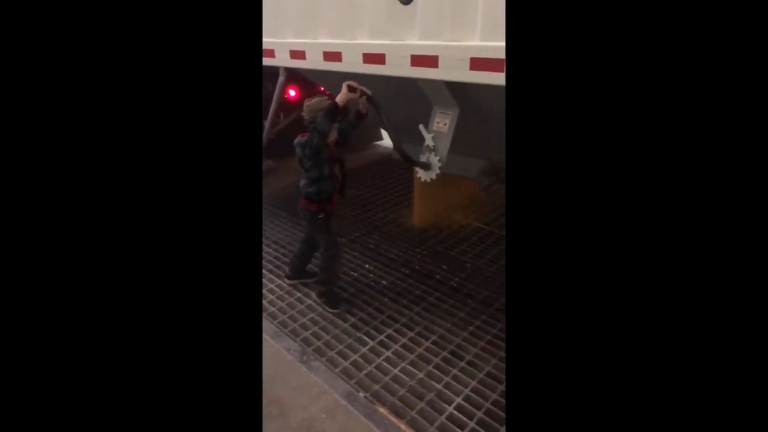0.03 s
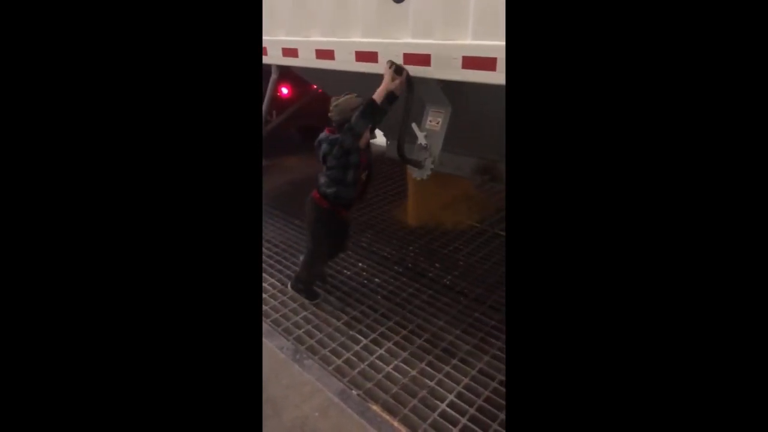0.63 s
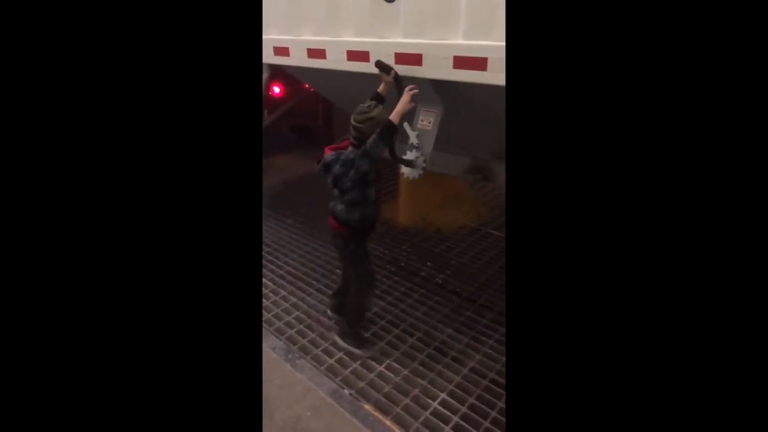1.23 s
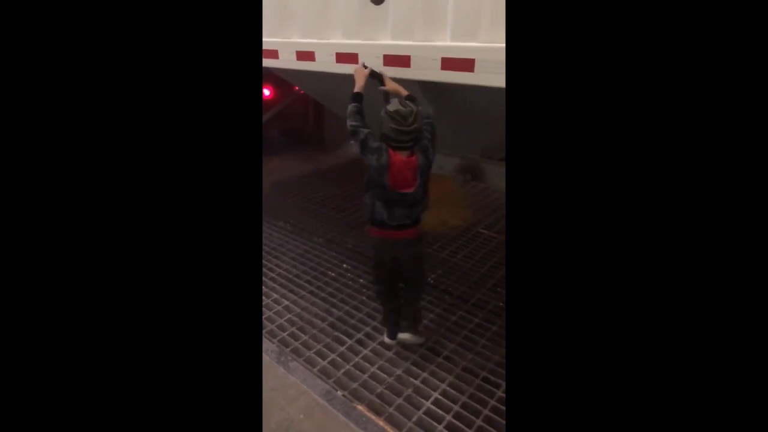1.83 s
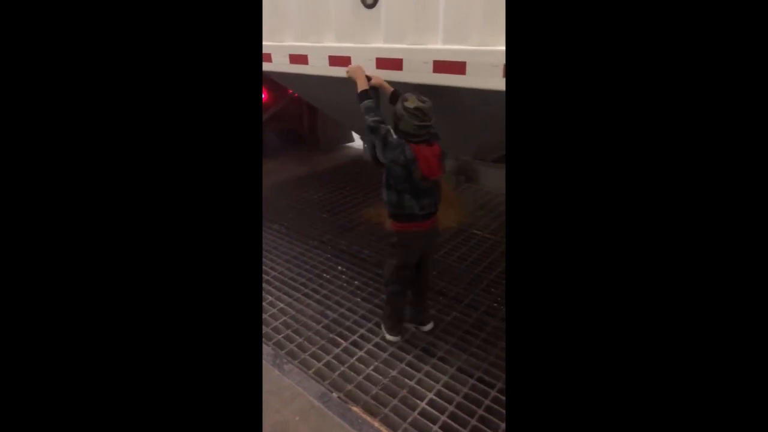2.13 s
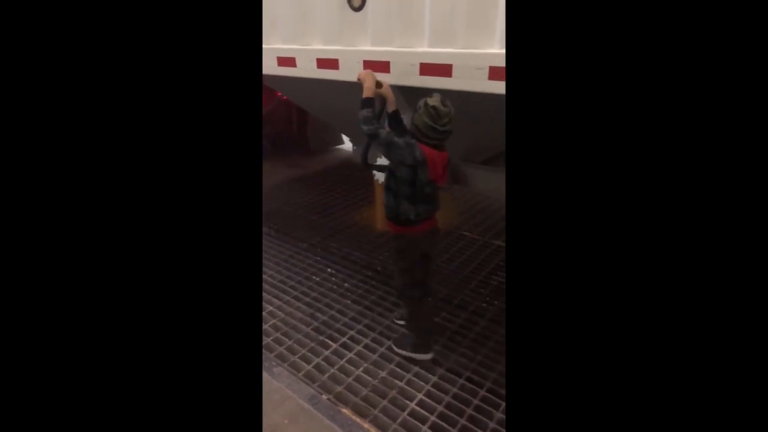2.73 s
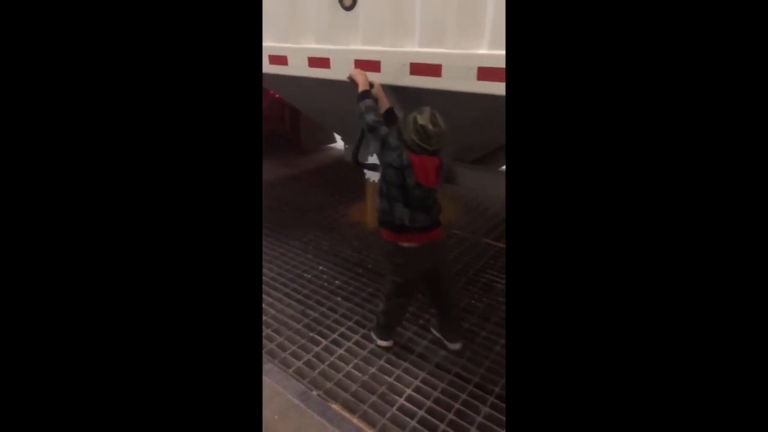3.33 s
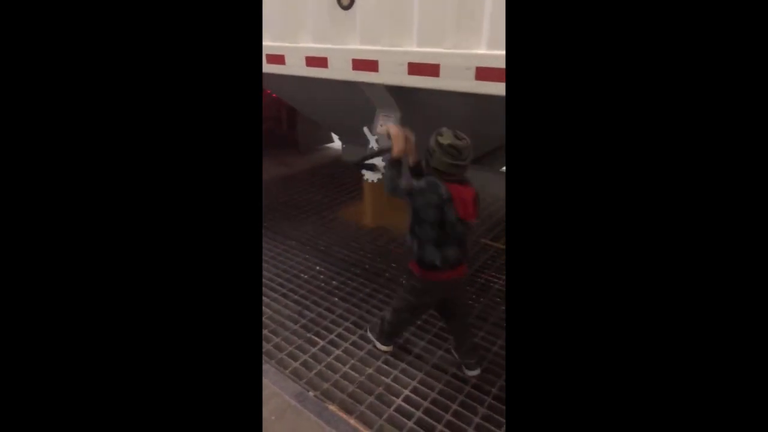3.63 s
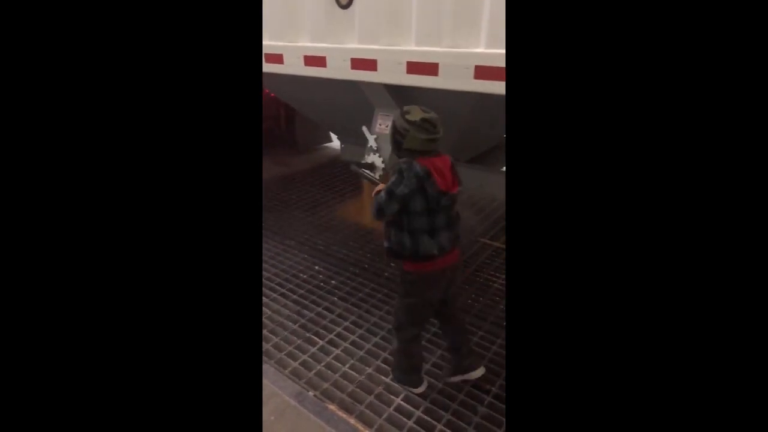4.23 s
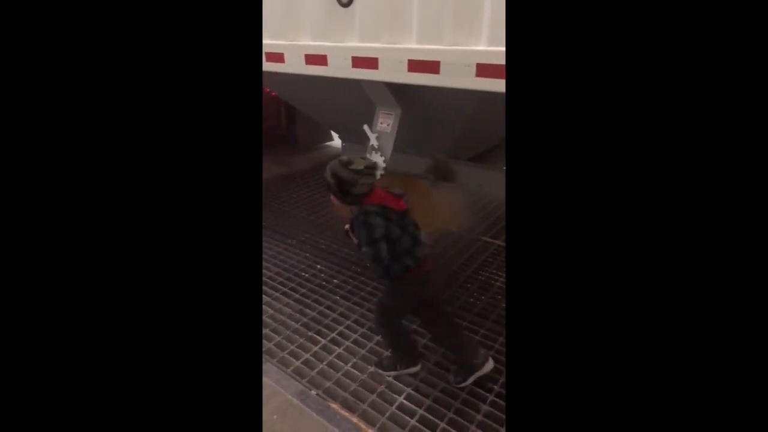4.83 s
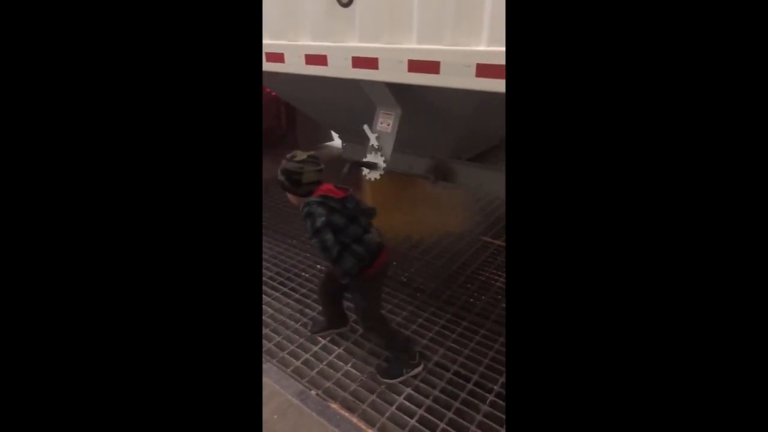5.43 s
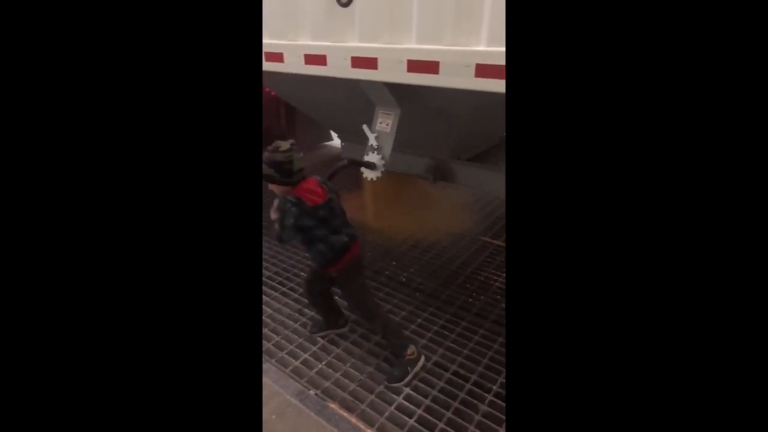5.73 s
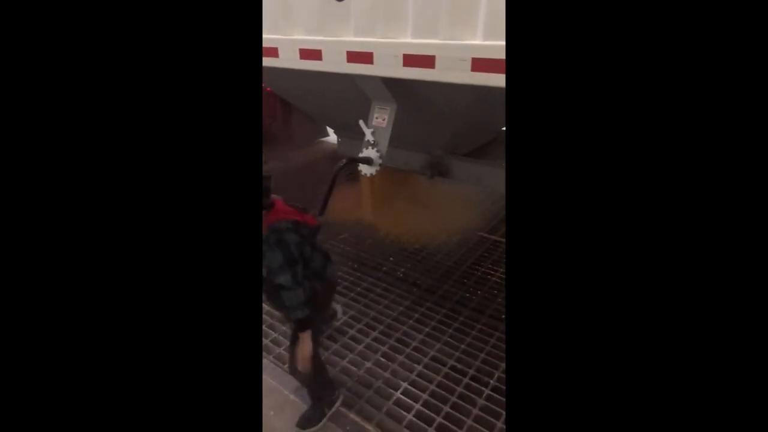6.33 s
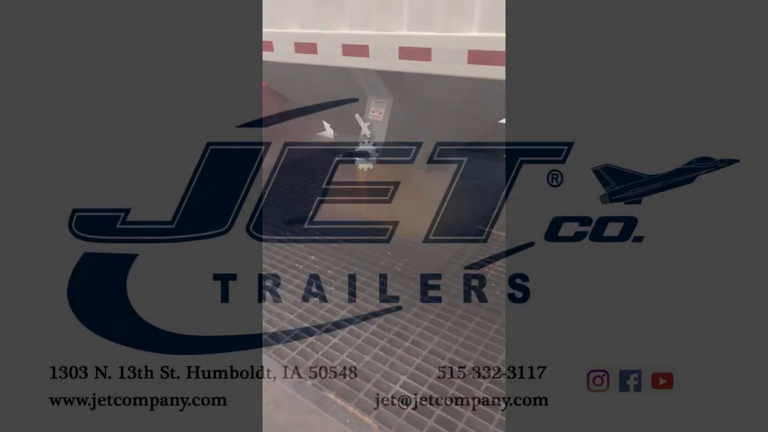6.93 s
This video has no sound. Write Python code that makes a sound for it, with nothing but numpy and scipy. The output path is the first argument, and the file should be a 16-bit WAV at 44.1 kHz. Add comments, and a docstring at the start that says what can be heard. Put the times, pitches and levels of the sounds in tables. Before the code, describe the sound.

A steady, close hiss of countless kernels striking steel bars fills the whole stretch, the hopper and the pit below ringing faintly with it. A low idling diesel and a faint conveyor whine sit underneath. Soft, dull knocks on the grate and crank appear around the middle, then small squeaks and short rings of steel near the end, while the grain keeps flowing.

```python
"""A dense hiss of grain pouring from a trailer's hopper through a steel floor grate.
Countless kernels strike the bars; hopper and pit ring under them. Soft knocks, faint squeaks and brief
rings of the steel come through as a child works the gate crank. Behind the pour a diesel idles with a
low hum and a conveyor whines thinly. Now and then the middle of the sound dips briefly."""
import sys
import numpy as np
from scipy import signal
from scipy.fft import rfft, irfft
from scipy.io import wavfile
from scipy.ndimage import uniform_filter1d

SR = 44100
rng = np.random.default_rng(int(sys.argv[2]) if len(sys.argv) > 2 else 0)


def transcribe(signal):
    """Save signal, clipped to [-1, 1], as a 16-bit WAV file at the path in sys.argv[1]."""
    frames = np.atleast_2d(signal).T
    limited = np.clip(frames, -1, 1)
    pcm = np.round(limited * 32767).astype(np.int16)
    wavfile.write(sys.argv[1], SR, pcm)


N = 313110
FREQ_HZ = np.fft.rfftfreq(N, 1 / SR)
TIME_S = np.arange(N) / SR
TICKS_S = np.arange(0, N / SR, .001)
EDGE_HZ = 9230

# hopper and pit resonances: (frequency [Hz], width [Hz], lift [dB])
HOPPER_MODES = [(213, 23, 5.7), (297, 59, 5.6), (391, 24, 6.5), (441, 23, 4.8), (483, 25, 10.4),
                (960, 104, 4.3), (1069, 16, 4.5), (1224, 98, 8.4), (1334, 65, 6.6), (1453, 46, 5.3),
                (1549, 23, 7.4), (1720, 24, 8.0), (1818, 25, 5.0), (1937, 37, 4.3), (2078, 39, 3.2),
                (2228, 80, 6.0), (2363, 138, 11.7), (2464, 23, 9.5), (2547, 145, 6.9), (2679, 36, 7.0)]


def gain_of(db):
    """Decibels to amplitude factor."""
    return 10 ** (np.asarray(db) / 20)


def unit_rms(x):
    """Scale to rms 1."""
    return x / np.sqrt(np.mean(x ** 2) + 1e-20)


def log_curve(points):
    """Join (frequency [Hz], value) points on a log-frequency axis."""
    hz, value = np.transpose(points)
    return np.interp(np.log(FREQ_HZ + 1), np.log(hz + 1), value)


def filtered(x, gain):
    """Apply a gain per frequency."""
    return irfft(rfft(x) * gain, N)


def lowpass(edge_hz, order):
    """Butterworth low-pass gain."""
    return 1 / np.sqrt(1 + (FREQ_HZ / edge_hz) ** (2 * order))


def highpass(edge_hz, order):
    """Butterworth high-pass gain."""
    return np.sqrt(1 - lowpass(edge_hz, order) ** 2)


def lift_db(modes):
    """Summed resonance peaks over frequency."""
    return sum(db / (1 + ((FREQ_HZ - hz) / (width_hz / 2)) ** 2) for hz, width_hz, db in modes)


def humps_db(rows):
    """Rounded humps over time from (time [s], height [dB], width at half height [s])."""
    humps = sum(db / (1 + (2 * (TICKS_S - at_s) / width_s) ** 6) for at_s, db, width_s in rows)
    return np.interp(TIME_S, TICKS_S, humps)


def wander(rate_hz):
    """Slow random drift, rms 1."""
    hz = np.fft.rfftfreq(len(TICKS_S), TICKS_S[1])
    spectrum = rfft(rng.standard_normal(len(TICKS_S))) * (hz > 0) * np.exp(-(hz / rate_hz) ** 2)
    return np.interp(TIME_S, TICKS_S, unit_rms(irfft(spectrum, len(TICKS_S))))


def patches(shape, size):
    """Smooth random field over (bins, frames), rms 1."""
    field = rng.standard_normal(shape)
    for axis in (0, 1, 0, 1):
        field = uniform_filter1d(field, size[axis], axis)
    return unit_rms(field)


def conveyor(pitch_hz=483, half_width_hz=8):
    """The conveyor under the grate whines: a narrow, unsteady noise band."""
    # whine envelope: (time [s], level [dB])
    whine = [(0, -54), (.7, -45), (3.2, -67), (4.75, -54), (5.9, -67), (6.25, -42), (7.1, -57)]
    band = filtered(rng.standard_normal(N), 1 / (1 + ((FREQ_HZ - pitch_hz) / half_width_hz) ** 2))
    return gain_of(np.interp(TIME_S, *np.transpose(whine))) * unit_rms(band)


def diesel(firing_hz=32.47, firings_per_turn=3, speed_waver=0.0027, throb_db=-0.9, rumble_db=-41.5):
    """An idling diesel hums at multiples of its crankshaft speed, over low machinery rumble."""
    # hum lines: (frequency [multiple of crankshaft speed])
    orders = [6, 9, 12, 14, 18, 19.5, 20, 26.5]
    # strength of each line: (rms level [dB])
    orders_db = [-37.5, -48.5, -53.5, -50, -58.5, -69.5, -54, -75]
    # machinery rumble spectrum: (frequency [Hz], relative density [dB])
    rumble_shape = [(10, -29.5), (25, -15.5), (45, -5), (70, 3.5), (100, -10), (135, -1), (175, -8.5),
                    (260, -29.5), (600, -53.5)]
    turns = np.cumsum(firing_hz / firings_per_turn * (1 + speed_waver * wander(3.2))) / SR
    hum = sum(gain_of(db) * np.sqrt(2) * np.sin(2 * np.pi * (order * turns + rng.random()))
              for order, db in zip(orders, orders_db))
    rumble = unit_rms(filtered(rng.standard_normal(N), gain_of(log_curve(rumble_shape))))
    return hum * gain_of(throb_db * wander(17)) + gain_of(rumble_db) * rumble


def squeaks_and_rings(jitter=0.0062):
    """Faint gliding squeaks near 1 kHz and brief steady rings of the steel; each swells and fades."""
    # squeaks and rings: (centre [s], length [s], pitch [Hz], glide [Hz/s], rms level at centre [dB])
    tones = [(4.874, 0.15, 970, 902.5, -42), (5.43, 0.15, 1536, -50, -40), (5.85, 0.12, 1353, -1, -39),
             (5.913, 0.1016, 1000, -200, -37), (6.091, .1, 890, -2600, -42), (6.533, 0.078, 1344, 3, -33)]
    out = np.zeros(N)
    unsteady = 1 + jitter * wander(60)
    for centre_s, length_s, hz, glide_hz_per_s, db in tones:
        t = np.clip(TIME_S - centre_s, -length_s / 2, length_s / 2)
        cycles = np.cumsum((hz + glide_hz_per_s * t) * unsteady) / SR
        out += gain_of(db) * np.cos(np.pi * t / length_s) * np.sqrt(2) * np.sin(2 * np.pi * cycles)
    return out


def knocks(rise_s=0.014):
    """Soft footfalls on the grate and knocks of the crank each ring one low mode of the steel."""
    # blows: (time [s], pitch [Hz], level the decay starts from [dB], t60 [s])
    blows = [(2.608, 105, -27, 0.23), (2.62, 153, -22.5, 0.073), (3.72, 310, -22, 0.12),
             (4.484, 298, -21.5, 0.13), (4.749, 101, -22, 0.12)]
    out = np.zeros(N)
    for at_s, hz, db, t60_s in blows:
        t = np.maximum(TIME_S - at_s, 0)
        out += gain_of(db - 60 * t / t60_s) * (1 - np.exp(-t / rise_s)) * np.sin(2 * np.pi * hz * t)
    return out


def bar_pings(low_hz=1500, high_hz=9200, strikes_per_s=420, t60_s=.17):
    """Bouncing kernels strike single bars equally hard; each rings briefly at its own pitch."""
    t = np.arange(SR // 4) / SR
    decay = gain_of(-60 * t / t60_s)
    out = np.zeros(N + SR)
    for when, pitch in rng.random((round(strikes_per_s * N / SR), 2)):
        hz = low_hz + pitch * (high_hz - low_hz)
        out[int(when * N):][:len(t)] += decay * np.sin(2 * np.pi * hz * t)
    return unit_rms(out[:N])


def kernel_impacts(near_per_s=7000, near_db=-7.5, mottle_db=-0.13, ping_db=-7):
    """Near impacts and ringing bars stand out of a wash of far impacts."""
    strength = gain_of(2.6 * np.minimum(rng.exponential(1, N), 6)) * rng.choice([-1, 1], N)
    near = unit_rms(strength * (rng.random(N) < near_per_s / SR))
    far = rng.standard_normal(N)
    hz, _, frames = signal.stft(far + gain_of(near_db) * near, SR, nperseg=1024, noverlap=768)
    # random patches flicker faintly in the treble
    flicker_db = mottle_db * patches(frames.shape, size=(3, 8)) * np.sqrt(hz / 5000)[:, None]
    _, wash = signal.istft(frames * gain_of(flicker_db), nperseg=1024, noverlap=768)
    return unit_rms(wash[:N]) + gain_of(ping_db) * bar_pings()


def grain_pour(full_flow_db=-18.5, pit_waver_db=0.5, wall_fade_db_per_s=0.1847):
    """Impacts drive the steel; pit, hopper walls, bars and hiss each follow the flow by their own amount."""
    # pour strength: (time [s], level [dB])
    flow = [(0.0, -18), (0.16, -18), (2.83, -18.5), (3.3, -20), (3.76, -19.5), (4.17, -20.5), (4.39, -20),
            (6.17, -20), (7.1, -18.5)]
    # falling grain without resonances: (frequency [Hz], relative density [dB])
    grain_shape = [(180, -10), (450, -10), (680, -12.5), (1100, -10.5), (2050, -12.5), (2400, -15.5),
                   (2900, -3.5), (3500, -4.5), (4750, -4.5), (5700, -3.5), (7300, -3), (8000, -4.5),
                   (9000, -7)]
    # grate bar resonances: (frequency [Hz], width [Hz], lift [dB])
    grate_modes = [(3310, 134, 4.1), (3484, 62, 3.0), (3634, 21, 5.1), (3809, 200, 5.4), (4054, 70, 4.4),
                   (4272, 200, 3.0), (4415, 62, 3.0), (4581, 128, 3.3), (5055, 200, 3.5), (5318, 37, 3.8),
                   (5594, 178, 2.7), (5793, 71, 3.3), (5976, 71, 3.8), (6127, 33, 4.4), (6251, 31, 2.6),
                   (6346, 46, 4.6), (6540, 22, 3.2), (6646, 200, 2.5), (7066, 95, 3.0), (7394, 34, 2.9),
                   (7548, 74, 2.4), (7833, 200, 5.0), (8061, 45, 3.7), (8160, 89, 4.3), (8249, 31, 3.6),
                   (8537, 118, 3.4), (8676, 68, 4.9), (8943, 113, 4.8)]
    # clumps hitting the grate at once: (time [s], lift [dB], length [s])
    surges = [(1.865, 2, 0.022), (1.97, 4.5, 0.025), (3.742, 7, 0.011), (5.91, 4, 0.053), (6.595, 5, 0.015)]
    colour = gain_of(log_curve(grain_shape) + lift_db(HOPPER_MODES) + lift_db(grate_modes))
    spectrum = rfft(kernel_impacts()) * colour * highpass(175, order=4) * lowpass(EDGE_HZ, order=40)
    flow_db = np.interp(TIME_S, *np.transpose(flow)) - full_flow_db
    surge_db = humps_db(surges)
    pit_db = -37.5 + 0.28 * flow_db + pit_waver_db * wander(22)
    walls_db = -28 + 0.66 * flow_db - wall_fade_db_per_s * TIME_S
    bars_db = -25 + 0.4 * flow_db + surge_db
    hiss_db = -20 + 1.25 * flow_db + 0.57 * surge_db
    crossovers = [0] + [lowpass(hz, order=16) ** 2 for hz in (750, 2900, 4500)] + [1]
    bands = [unit_rms(irfft(spectrum * (hi - lo), N)) for lo, hi in zip(crossovers, crossovers[1:])]
    return sum(gain_of(db) * band for db, band in zip((pit_db, walls_db, bars_db, hiss_db), bands))


def midrange_dips(x, deep_db=-21, shallow_db=-6, shallow_s=0.019, shallow_count=12):
    """The midrange drops for 10-30 ms at a time; the hopper's strongest resonances ring on."""
    # deep dips: (time [s], length [s])
    deep_dips = [(.912, .03), (1.775, .014), (1.967, .016), (2.396, .014), (2.928, .01), (3.311, .013),
                 (3.502, .013), (3.694, .014), (3.738, .015), (4.25, .014), (4.506, .012), (4.762, .015),
                 (5.102, .013), (5.549, .013), (5.636, .015), (5.7, .015), (5.849, .016), (5.912, .014),
                 (6.147, .019), (6.19, .012), (6.511, .014), (6.554, .017), (6.596, .016)]
    # part of the spectrum that dips: (frequency [Hz], share [0-1])
    reach = [(110, 0), (220, .8), (600, 1), (2200, 1), (2800, .6), (3600, .15), (4700, .4), (5500, 0)]
    spared = np.clip((lift_db(HOPPER_MODES) - 6) / 4, 0, 1)  # ramps over 6-10 dB of lift
    middle = filtered(x, log_curve(reach) * (1 - spared))
    shallow_times_s = TIME_S[-1] * np.sqrt(rng.random(shallow_count))  # denser towards the end
    deep = [(at_s, deep_db, length_s) for at_s, length_s in deep_dips]
    shallow = [(at_s, shallow_db, shallow_s) for at_s in shallow_times_s]
    return x - (1 - gain_of(humps_db(deep + shallow))) * middle


def scene():
    """Only the pour and machinery dip; both channels alike."""
    mono = midrange_dips(grain_pour() + diesel() + conveyor()) + knocks() + squeaks_and_rings()
    return np.array([mono, mono])


def record(dry):
    """Steep low-pass at EDGE_HZ."""
    taps = signal.firwin(401, EDGE_HZ, window=("kaiser", 9), fs=SR)
    return signal.oaconvolve(dry, taps[None], "same")


dry = scene()
out = record(dry)
transcribe(out)
```